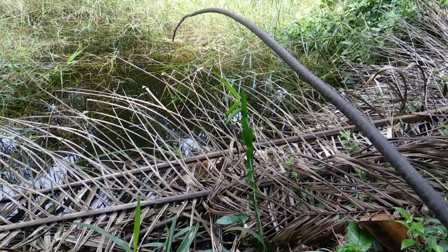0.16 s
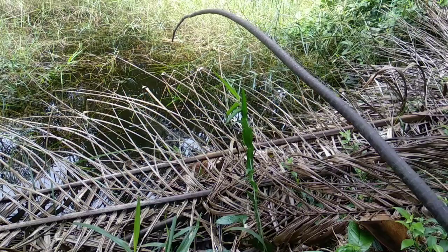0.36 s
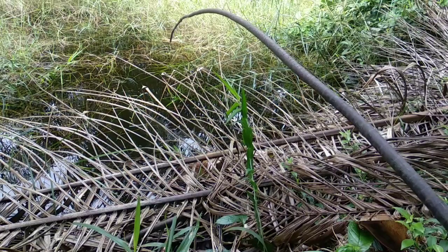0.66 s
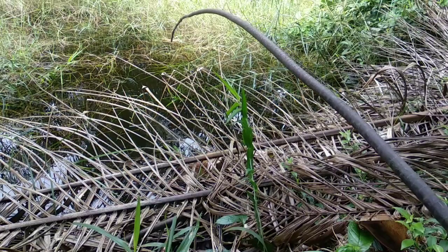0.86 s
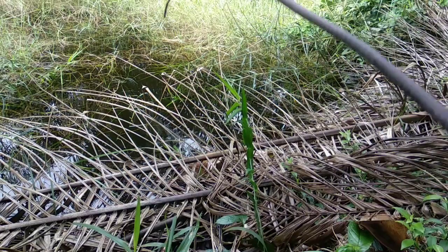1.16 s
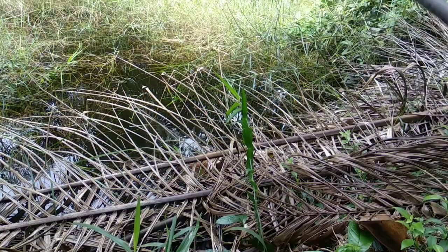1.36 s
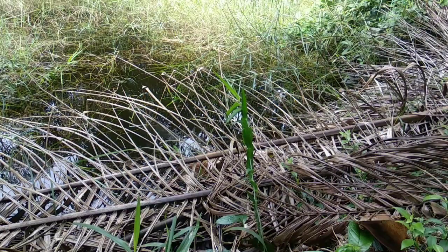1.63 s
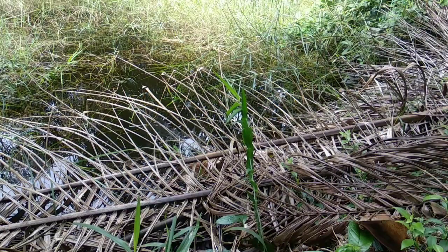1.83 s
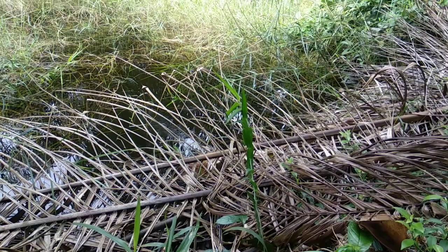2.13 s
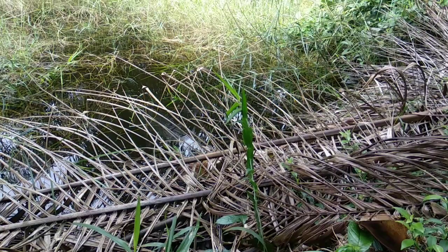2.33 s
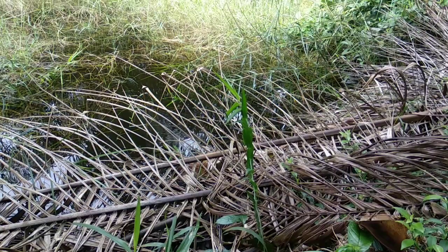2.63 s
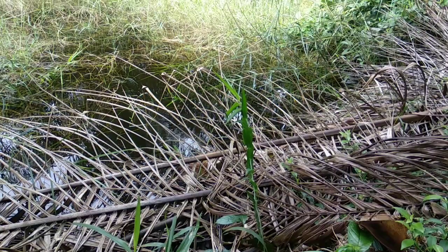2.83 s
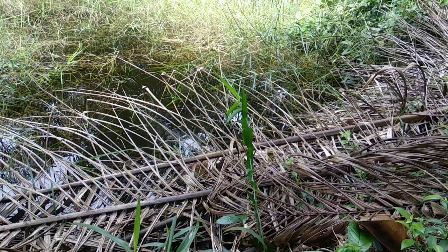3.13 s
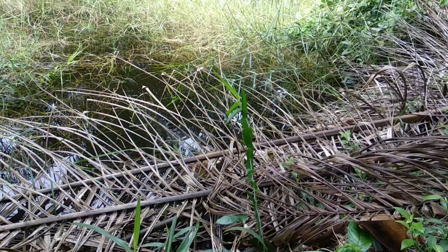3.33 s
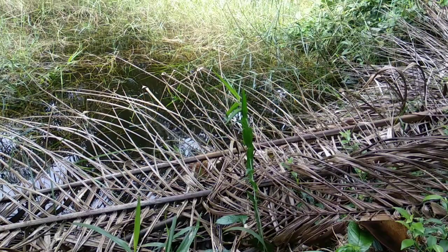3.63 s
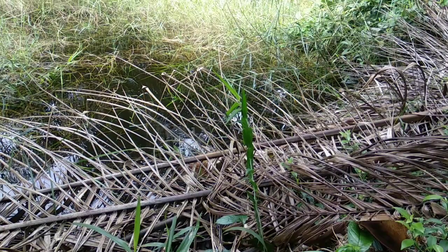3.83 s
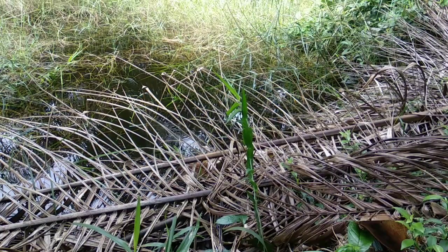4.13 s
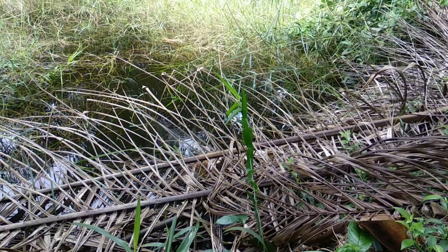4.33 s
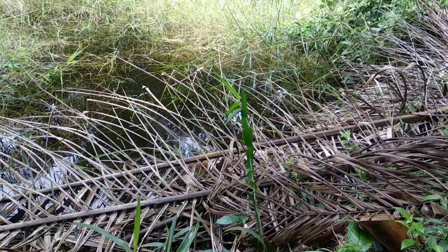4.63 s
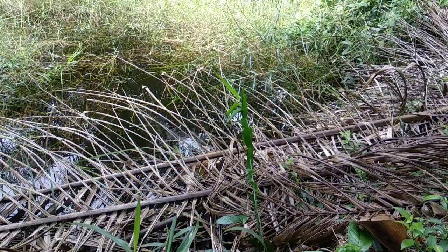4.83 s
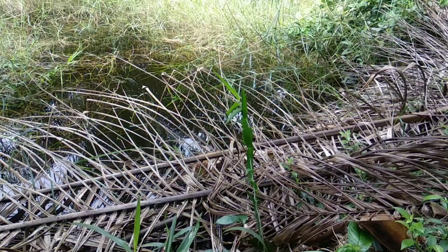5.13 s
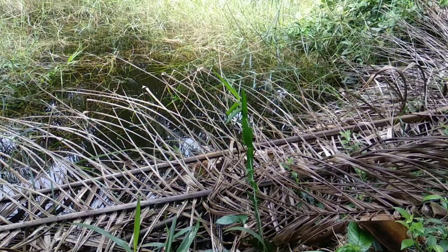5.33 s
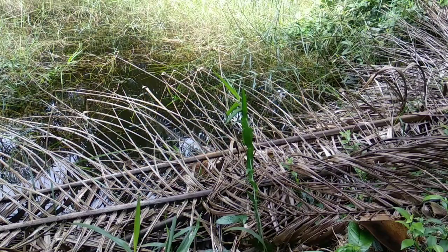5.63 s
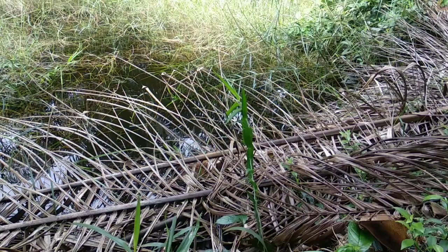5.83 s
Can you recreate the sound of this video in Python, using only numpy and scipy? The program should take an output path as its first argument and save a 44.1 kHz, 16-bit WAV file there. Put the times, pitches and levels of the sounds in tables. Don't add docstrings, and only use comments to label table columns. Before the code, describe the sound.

A six-second outdoor stereo ambience at a reedy pond edge. Throughout, crickets sing very high, near-pure chirps around 8 kHz, about sixteen a second, in phrases of roughly one to two seconds with brief staggered gaps; the loudest sits slightly left, others spread from the middle to far right, softened by scattering reeds. A continuous, rough katydid buzz slightly higher up leans right. Underneath, a distant vehicle drones near 90 Hz with soft tyre and exhaust rumble, sinking slightly in pitch between 1.3 and 3 seconds, strongest about 2.1, then moving right and fading from 3.3 to the end. A faint 57 Hz pump hum grows after 3. Breeze puffs shift the rumble and airy leaf hiss. Tiny far bird peeps occur near 0.3, 1.25, 3.15 and 5.4; thin whistles glide upward at 4.0 and 4.35, with a last faint peep at 5.9. Faint rustles at 1.7 and 5.8.

```python
import sys
import numpy as np
from scipy import signal
from scipy.fft import rfft, irfft
from scipy.io import wavfile
from scipy.ndimage import uniform_filter1d

SR = 44100
rng = np.random.default_rng(int(sys.argv[2]) if len(sys.argv) > 2 else 0)


def invert_db(x):
    u = np.asarray(x, float) / 20
    return 10 ** u


def digitize_waveform(pressure):
    field = np.atleast_2d(pressure).T
    bounded = np.clip(field, -1, 1)
    quanta = np.round(bounded * 32767).astype(np.int16)
    wavfile.write(sys.argv[1], SR, quanta)


N = 263277
T = np.arange(N) / SR

# top_pitch_hz, chirps_per_s
CRICKETS = [(8190, 16.64), (8035, 17.3), (8040, 16.2), (8075, 15.1), (7865, 15.55), (8305, 16.65),
            (7790, 15.3), (7562, 32.)]
# first_chirp_middle_s, end_s
PHRASES = [
    [(.047, 1.28), (1.618, 2.55), (2.761, 4.17), (4.506, 6.)],
    [(.045, .33), (.562, 2.87), (3.043, 4.4), (4.541, 6.)],
    [(-.01, 1.33), (1.44, 2.85), (3.057, 4.4), (4.5, 5.6)],
    [(.02, .9), (1.15, 2.5), (2.6, 3.9), (4.1, 6.)],
    [(.048, .95), (1.4, 2.3), (2.75, 3.4), (3.61, 4.35), (4.837, 5.7)],
    [(.052, 3.3), (3.6, 4.3), (4.51, 6.)],
    [(.048, .95), (1.7, 2.1), (2.76, 3.4), (3.6, 4.3), (4.517, 6.)],
    [(.065, .93), (1.245, 2.1), (2.47, 3.08), (3.42, 3.97), (4.2, 4.78), (4.95, 6.)],
]
# left_db, right_db, left_lag_ms, scattered_db
PERCHES = [(-25.5, -27, 0.3376, -5.5), (-31, -28, 0.308, -3), (-32.5, -38.5, -0.189, -6.5),
           (-36.5, -38.5, -0.107, 3.5), (-37.5, -39, -0.313, 0), (-55, -32.5, 0.424, -3),
           (-45.5, -53, 0.079, 10), (-52, -50, 0.135, -4.5)]
# time_from_middle_s, share_of_top_pitch, level_db
WING_STROKE = [(-.017, .978, -24), (-.012, .990, -7), (-.008, .999, -1.5), (.004, 1.001, -.5),
               (.009, .985, -4), (.016, .968, -20)]
# clicks_per_s, throbs_per_s, throb_depth_db, left_db, right_db
KATYDIDS = [(90., 9.15, 2.5, -12, -2), (130., 7.6, 1.5, -9, -2), (119., 11.3, .8, -5, -6),
            (170., 13.1, .6, -4, -8)]
# pitch_hz, level_db_per_hz
WING_TONE = [(7000, -74), (7500, -21), (7900, 3.5), (8500, -3.5), (9100, 2), (9450, 2), (9600, 9),
             (9700, 4.5), (9850, -2.5), (10150, -4), (10500, -15.5), (10800, -38), (12500, -36)]
# time_s, pitch_hz
ENGINE_PITCH = [(0, 91), (.7, 91), (1.3, 90.7), (2.0, 88.7), (3.0, 87.03), (4.5, 87.3), (5.97, 87.37)]
# multiple_of_pitch, level_db, share_of_fade, flutter_db
FIRING_ORDERS = [(1, -35, 0.74, 2.5), (2, -32, 1.23, 2.5)]
# time_s, level_db
PUMP_HUM = [(0, -62), (3.0, -58), (3.5, -53), (4.5, -51), (5.97, -51)]
# time_s, level_db
NEARNESS = [(0, -4), (.5, -1.5), (1.2, -2), (1.6, -1.5), (2.1, 0.5), (2.9, -2), (3.3, -3), (3.6, -6),
            (4.2, -9.5), (4.7, -11.5), (5.3, -14), (5.97, -17)]
# time_s, lag_ms
LEFT_LAG = [(0, .13), (.75, 0.23), (1.25, 0.38), (1.75, .43), (2.5, 0.46), (5.97, 0.4)]
# pitch_hz, level_db_per_hz
ROAD_AND_AIR_TONE = [(40, -55), (68, -16), (105, -1.5), (140, -1.5), (260, -3.5), (340, -11.5), (420, -15),
                     (600, -20), (850, -8.5), (1300, -13), (2100, -20.5), (2800, -26), (5000, -32), (6600, -34.5),
                     (6700, -28), (6950, -50), (7400, -54), (10500, -32), (11600, -35.5), (12800, -38.5),
            (14000, -41), (15200, -45), (15600, -70)]
# pitch_hz, share
FADE_SHARE = [(100, 0.23), (250, 1.3), (470, 0.21), (800, 0.88), (1800, 0.76), (4500, 0.55), (12000, 0.45)]
# pitch_hz, likeness
EAR_LIKENESS = [(60, .99), (250, .98), (420, .8), (900, .82), (1800, .55), (3500, .3), (7000, .12)]
# pitch_hz, difference_db
EAR_BALANCE = [(60, -9), (180, 2), (540, -2.5), (1640, -1), (4920, -0.5), (14800, -5)]
# time_s, edge_hz
RUMBLE_EDGE = [(0, 358), (1.45, 355), (1.65, 264), (1.9, 287), (2.1, 405), (2.6, 343), (2.9, 285),
               (3.2, 290), (3.35, 323), (3.6, 313), (4.2, 270.8), (5.97, 278)]
# middle_s, length_s, centre_hz, width_octaves, level_db
PUFFS = [(0.036, 0.28, 72, 0.5, -7), (1.1, 0.24, 130, 0.35, 9), (1.38, 0.068, 120, 0.7, -5.5),
         (2.11, 0.13, 88, 0.29, 3.5), (0.68, .12, 82, 0.17, -22.5), (0.49, 0.36, 179.3, 0.1, 5.5),
         (1.93, 0.88, 169.6, 0.1, -10.5), (2.9, 0.79, 175, 0.39, 3.5), (4.35, 0.26, 177, 0.13, 7),
         (0.1, 0.94, 835, 0.69, -9), (1.08, 0.9, 530, 0.92, 5), (1.65, 0.11, 600, 1.2, -4),
         (2.85, 0.25, 1030, 0.79, 6), (3.4, 0.086, 556, 0.17, 19), (0.47, 1, 2600, 1.5, 0.5),
         (1.63, 0.17, 1900, 2.1, -3), (2.2, 0.36, 1540, 0.53, 4), (4.27, 0.53, 2200, 1.5, 3.5),
         (0.71, 0.21, 4500, 0.69, -3), (1.656, 0.29, 6200, 1.8, 5), (2.42, 0.24, 5600, 1.7, 5),
         (4.4, 1, 10500, .4, -8.5), (0.62, 0.28, 11700, 0.72, -5), (3.0, 0.98, 12500, .5, -2)]
# time_s, pitch_hz, level_db
WHISTLES = [
    [(4.03, 5200, -62.5), (4.12, 5305, -61), (4.2, 5430, -60), (4.3, 5400, -70)],
    [(4.34, 5060, -58.5), (4.4, 5300, -60), (4.45, 5400, -70), (4.6, 5330, -70)],
    [(5.895, 5050, -82), (5.925, 5070, -56), (5.945, 5100, -64), (5.97, 5180, -56)],
    [(.19, 13400, -113), (.215, 13800, -70), (.24, 13500, -75.5), (.275, 14050, -68), (.3, 13600, -65),
     (.36, 13800, -54), (.43, 13800, -53), (.49, 13100, -73.5)],
]
# start_s, length_s, centre_hz, width_hz, level_db
PEEPS = [
    (.27, .06, 5750, 700, -52.5),
    (1.04, .05, 5600, 1200, -57),
    (1.25, .08, 5750, 600, -53.5),
    (3.15, .1, 6150, 500, -53.5),
    (5.41, .16, 5850, 900, -59.5),
    (1.725, .05, 12600, 3200, -55),
    (.87, .03, 11700, 700, -59),
    (5.75, .22, 640, 220, -53),
]
# pitch_hz, share
GATE_SHUT = [(1800, 0), (5200, .24), (6700, .42), (7250, .92), (7550, 0), (10400, 0), (11100, .55),
             (15000, .48)]


def evened(x):
    return x / np.sqrt(np.mean(x ** 2) + 1e-20)


def columns(rows, t):
    s, *values = np.transpose(rows)
    return [np.interp(t, s, v) for v in values]


def read(points, hz):
    f, value = np.transpose(points)
    return np.interp(np.log(hz + 1), np.log(f + 1), value)


def add(mix, start_s, sound):
    at = round(start_s * SR)
    part = mix[..., max(at, 0):max(at + sound.shape[-1], 0)]
    part += sound[..., max(-at, 0):][..., :part.shape[-1]]


def resonate(x, hz, width_hz):
    turn = np.exp(2j * np.pi * np.cumsum(hz * np.ones(len(x))) / SR)
    r = np.exp(-np.pi * width_hz / SR)
    smoothed = signal.lfilter([(1 - r) ** 2], np.convolve([1, -r], [1, -r]), x / turn)
    return 2 * (turn * smoothed).real


def scattered(x, t60):
    t = np.arange(SR // 3) / SR
    tails = rng.standard_normal((3, 2, len(t))) * invert_db(-60 * t / t60) * np.clip(t / 0.008, 0, 1)
    tails /= np.linalg.norm(tails, axis=2, keepdims=True)
    out = 0
    for k, tail in enumerate(tails):
        turn = np.sqrt(2 / 3) * np.cos(2 * np.pi * (.8 * T + k / 3))
        out = out + signal.oaconvolve(x * turn, tail, axes=1)[:, :N]
    return out


def crickets():
    near, far = np.zeros((2, N)), np.zeros((2, N))
    t = np.arange(WING_STROKE[0][0], WING_STROKE[-1][0], 1 / SR)
    share, stroke_db = columns(WING_STROKE, t)
    loudness = invert_db(stroke_db) * signal.windows.tukey(len(t), .25)
    for (hz, rate), (left_db, right_db, lag_ms, wet_db), phrases in zip(CRICKETS, PERCHES, PHRASES):
        ears_db = np.array([[left_db], [right_db]])
        far_db = .5 * (ears_db + ears_db.mean()) + wet_db
        lag_turns = np.array([[lag_ms * hz / 1000], [0]])
        chance = rng.standard_normal((len(phrases), 80, 5))
        for (first, end), draws in zip(phrases, chance):
            for s, (early, bend, phase, left, right) in zip(np.arange(first, end, 1 / rate), draws):
                turns = np.cumsum(hz * share * (1 + .0015 * bend)) / SR + 3 * phase
                chirp = loudness * np.sin(2 * np.pi * (turns - lag_turns))
                start_s = s + t[0] + .0015 * early
                wander_db = 0.93 * np.array([[left], [right]])
                add(near, start_s, invert_db(ears_db + wander_db) * chirp)
                add(far, start_s, invert_db(far_db) * chirp)
    return near + scattered(far, t60=.33)


def katydids():
    out = np.zeros((2, N))
    for rate, throb, depth_db, left_db, right_db in KATYDIDS:
        uneven = evened(uniform_filter1d(rng.standard_normal(N), size=300))
        turns = np.cumsum(rate * (1 + 0.27 * uneven)) / SR
        scrape = np.exp(-(turns % 1) / 1.1) * rng.standard_normal(N)
        scrape *= invert_db(depth_db * np.sin(2 * np.pi * (throb * T + rng.random())))
        out += invert_db(np.array([[left_db], [right_db]])) * scrape
    out += invert_db(-4.) * scattered(out, t60=.09)
    hz = np.fft.rfftfreq(N, 1 / SR)
    peaky = np.array([[.8], [1.05]])
    out = irfft(rfft(out) * invert_db(peaky * read(WING_TONE, hz)), N)
    return invert_db(-40.5) * evened(out)


def breeze_db(hz, t):
    total_db = 0
    for middle_s, length_s, mid_hz, octaves, db in PUFFS:
        away_s = (t - middle_s) / length_s
        away_pitch = np.log2((hz + 1) / mid_hz) / octaves
        total_db = total_db + db * np.exp(-away_s ** 2 * 2 - away_pitch ** 2 * 2)
    return total_db


def engine():
    out = np.zeros((2, N))
    (hz,), (lag_ms,), (near_db,) = columns(ENGINE_PITCH, T), columns(LEFT_LAG, T), columns(NEARNESS, T)
    chance = [evened(v) for v in uniform_filter1d(rng.standard_normal((5, N)), size=6000, axis=1)]
    levels_db = []
    for (k, db, share, flutter_db), flutter in zip(FIRING_ORDERS, chance[3:]):
        levels_db.append(db + share * near_db + breeze_db(k * hz, T) + flutter_db * flutter)
    levels_db += columns(PUMP_HUM, T)
    pitches = [hz, 2 * hz, 57.0 + 0 * hz]
    sways = [.72, .7, .25]
    for tone_hz, level_db, sway, wander in zip(pitches, levels_db, sways, chance):
        angle = 2 * np.pi * np.cumsum(tone_hz) / SR + sway * wander
        delay = 2 * np.pi * tone_hz * lag_ms / 1000 * np.array([[.75], [0]])
        out += np.sqrt(2) * invert_db(level_db) * np.sin(angle - delay)
    return out


def road():
    frames, bins_hz = N // 512 + 5, np.fft.rfftfreq(2048, 1 / SR)
    t, hz = np.arange(frames) * 512 / SR, bins_hz[:, None]
    a, b, c, d, patches = rng.standard_normal((frames, 1025, 5)).T
    patches = uniform_filter1d(uniform_filter1d(patches, size=12, axis=0), size=10, axis=1)
    patches_db = 1.26 * evened(patches)
    swing_db = read(FADE_SHARE, hz) * columns(NEARNESS, t)[0] + breeze_db(hz, t)
    alike = np.clip(read(EAR_LIKENESS, hz), 0, 1)
    right, own = a + 1j * b, c + 1j * d
    late = np.exp(-2j * np.pi * hz * columns(LEFT_LAG, t)[0] / 1000)
    z = np.array([alike * late * right + np.sqrt(1 - alike ** 2) * own, right])
    tilt_db = read(EAR_BALANCE, hz) * np.array([.5, -.5])[:, None, None]
    above = np.clip(np.log(hz / columns(RUMBLE_EDGE, t)[0] + 1e-9) / 0.03, 0, 1)
    tilt_db = tilt_db - 8.25 * above * np.clip((560 - hz) / 120, 0, 1)
    z *= invert_db(read(ROAD_AND_AIR_TONE, hz) + swing_db + patches_db + tilt_db)
    return invert_db(-33.0) * evened(signal.istft(z, nperseg=2048, noverlap=1536)[1][:, :N])


def birds():
    out = np.zeros((2, N))
    for rows in WHISTLES:
        start_s, end_s = rows[0][0], rows[-1][0]
        hz, level_db = columns(rows, np.arange(start_s, end_s, 1 / SR))
        tone = invert_db(level_db - 1) * np.sin(2 * np.pi * np.cumsum(hz) / SR)
        add(out, start_s, tone * signal.windows.tukey(len(hz), .1) * np.ones((2, 1)))
    for start_s, length_s, hz, width_hz, level_db in PEEPS:
        breath = rng.standard_normal((2, 9000))
        breathy = np.array([evened(resonate(v, hz, width_hz)) for v in breath])
        shape = np.hanning(min(round(length_s * SR), 9000))
        add(out, start_s, invert_db(level_db) * breathy[:, :len(shape)] * shape)
    return out + invert_db(2.0) * scattered(out, t60=0.39)


def gated(x):
    hz, t, z = signal.stft(x, SR, nperseg=1024, noverlap=768)
    power = (abs(z) ** 2).sum(0)
    power = uniform_filter1d(uniform_filter1d(power, size=4, axis=0), size=6, axis=1)
    slow = uniform_filter1d(power, size=100, axis=1) + 1e-20
    power = power / slow ** .85
    rank = power.argsort(1).argsort(1) / len(t)
    gain = np.where(rank < read(GATE_SHUT, hz)[:, None], invert_db(-30), 1)
    return signal.istft(z * gain, SR, nperseg=1024, noverlap=768)[1][:, :N]


def scene():
    return crickets() + katydids() + engine() + road() + birds()


def roll_off(x):
    return signal.sosfilt(signal.butter(12, 15420, fs=SR, output="sos"), x)


def record(dry):
    bass_cut = signal.butter(4, 42., "highpass", fs=SR, output="sos")
    mix = gated(signal.sosfilt(bass_cut, dry))
    return roll_off(mix)


dry = scene()
out = record(dry)
digitize_waveform(out)
```